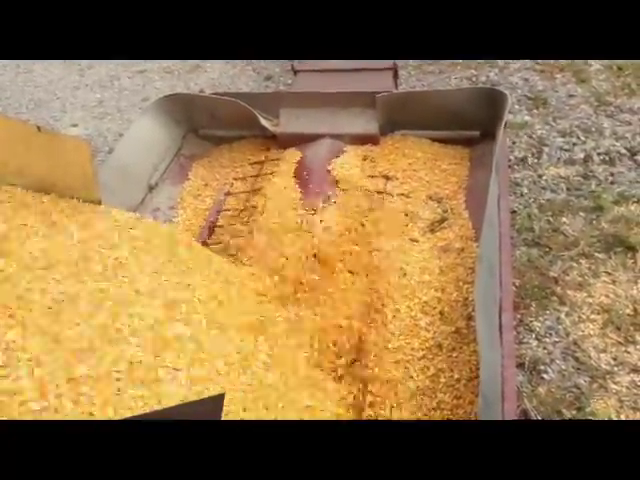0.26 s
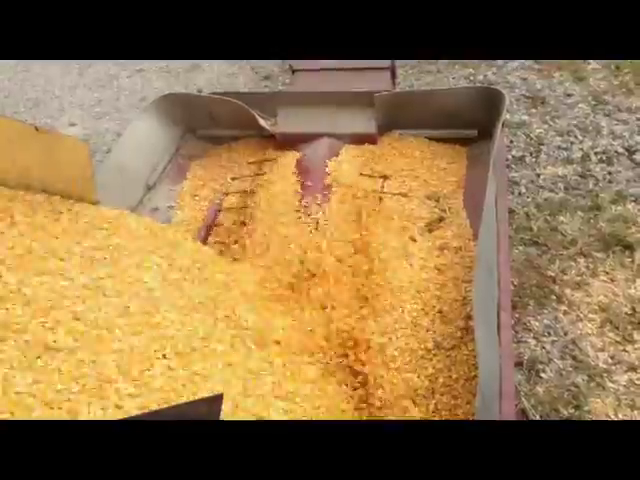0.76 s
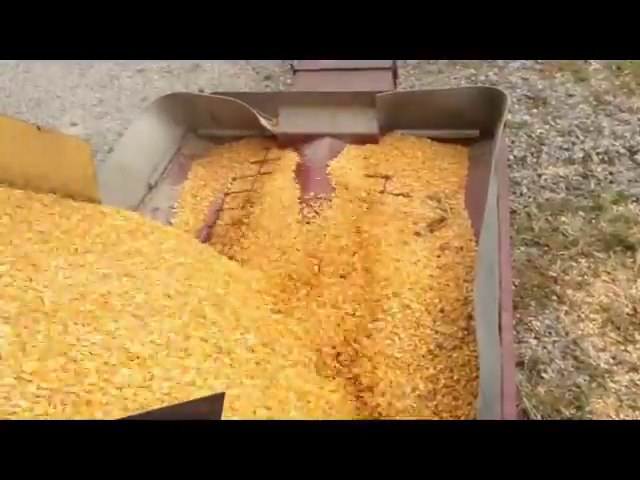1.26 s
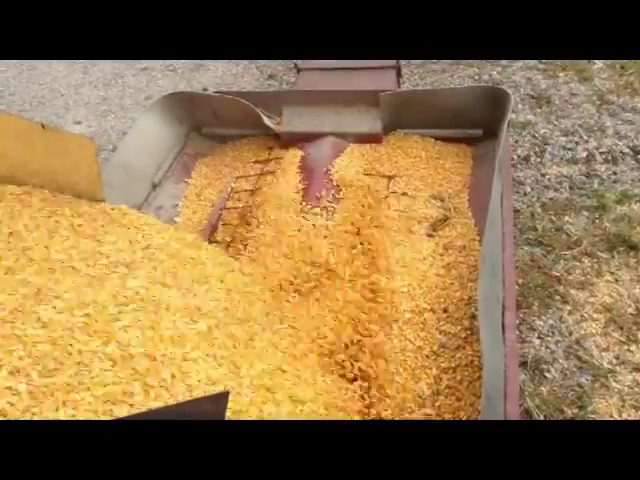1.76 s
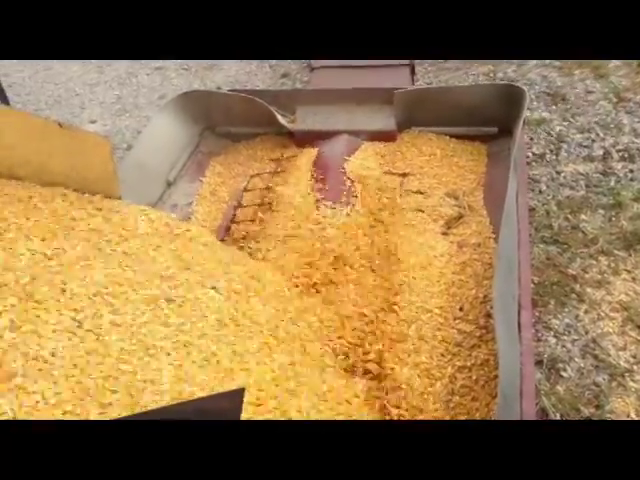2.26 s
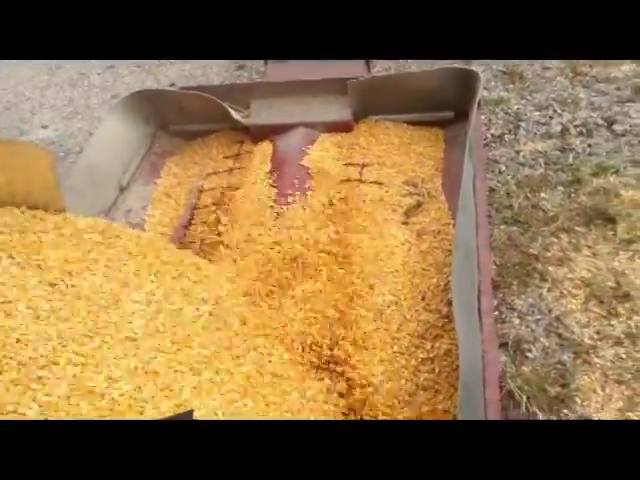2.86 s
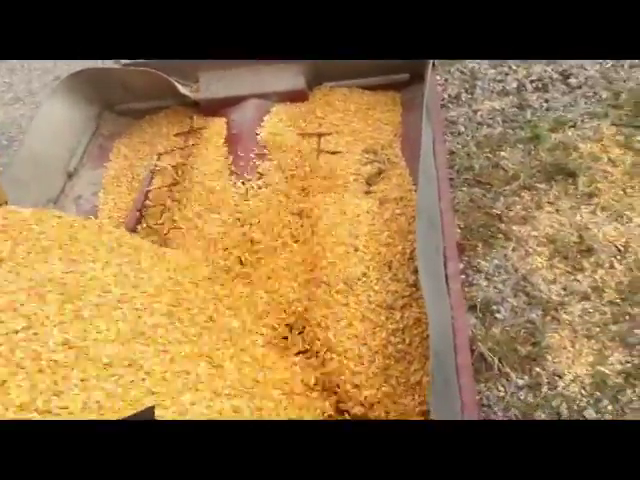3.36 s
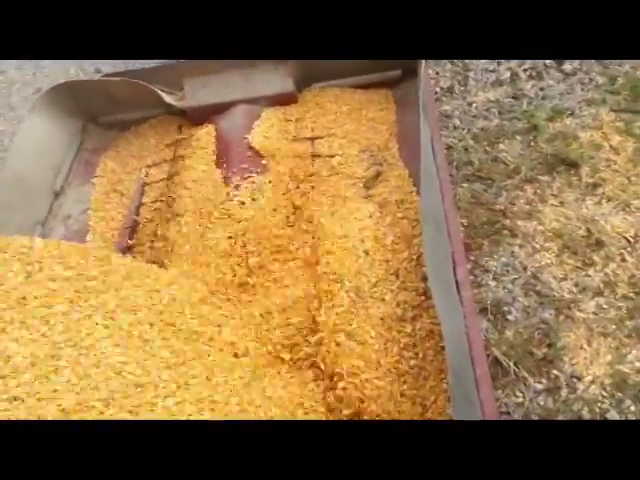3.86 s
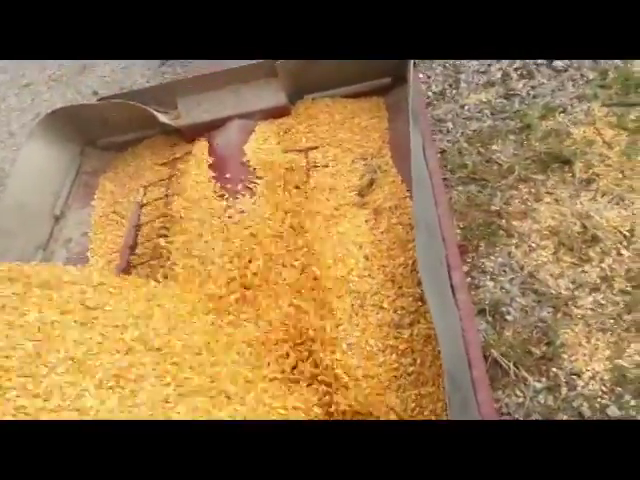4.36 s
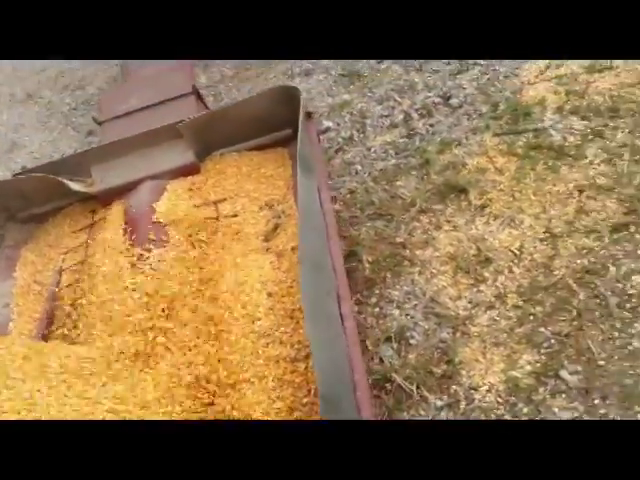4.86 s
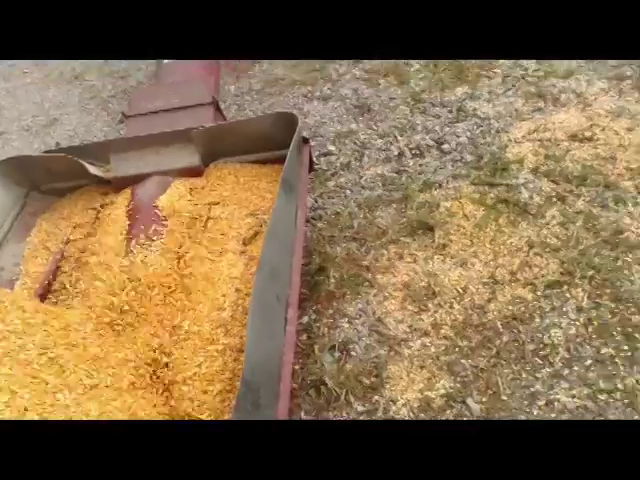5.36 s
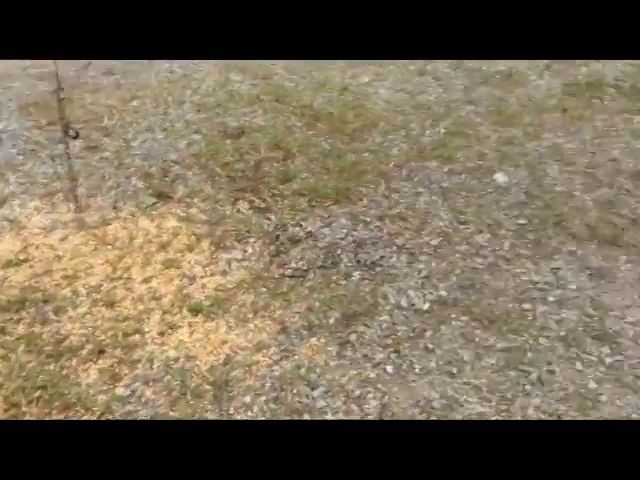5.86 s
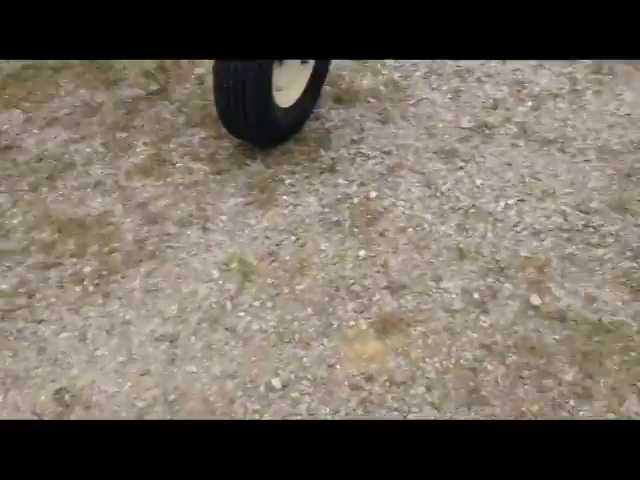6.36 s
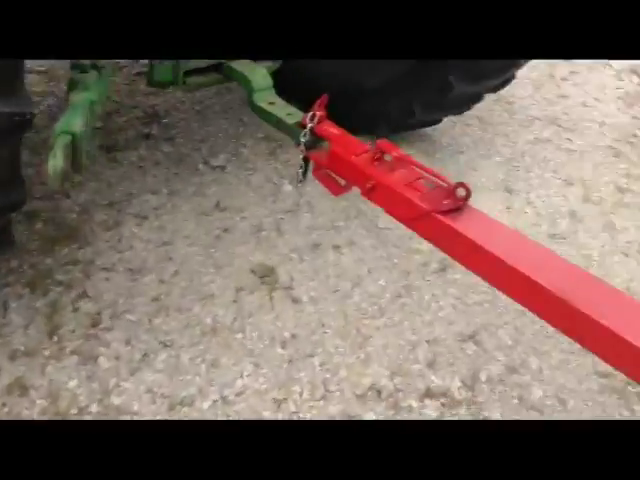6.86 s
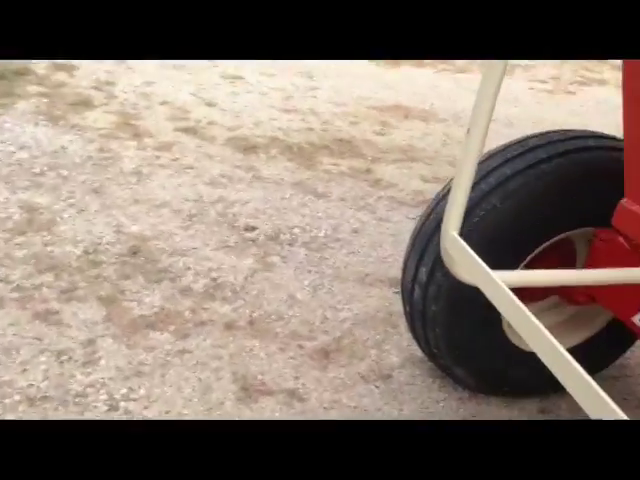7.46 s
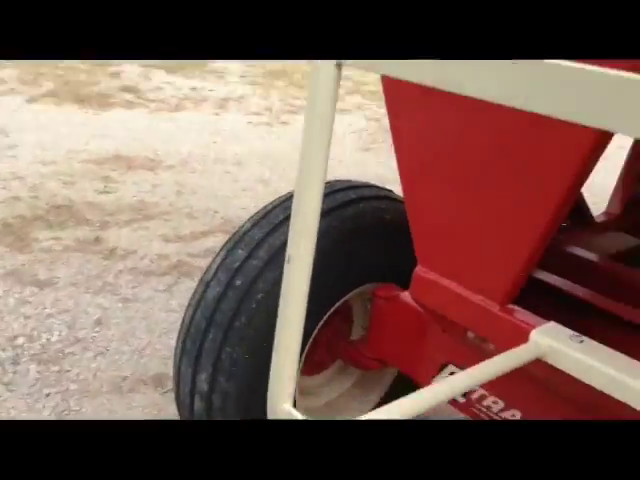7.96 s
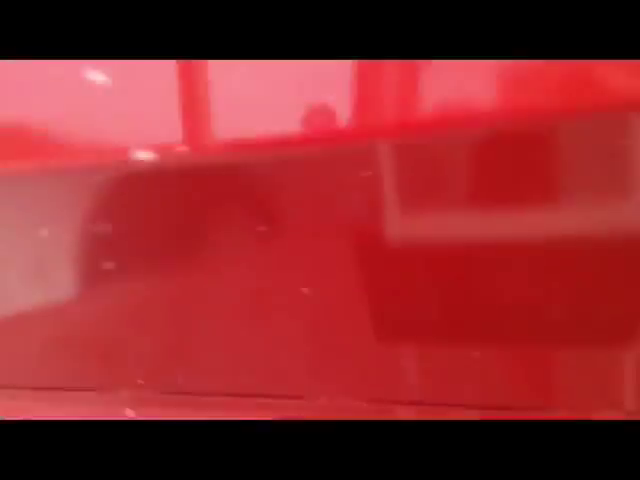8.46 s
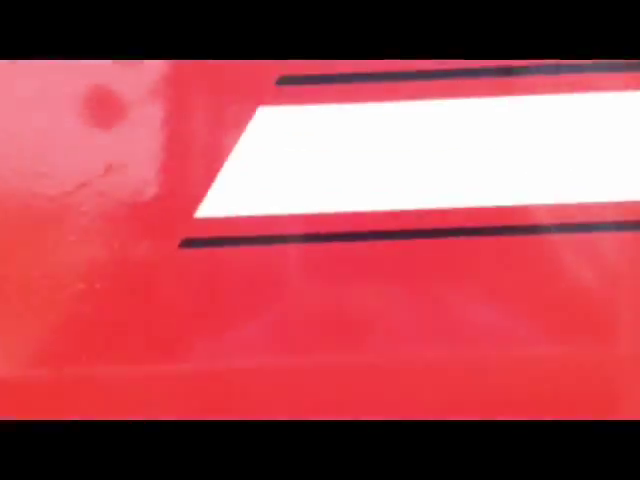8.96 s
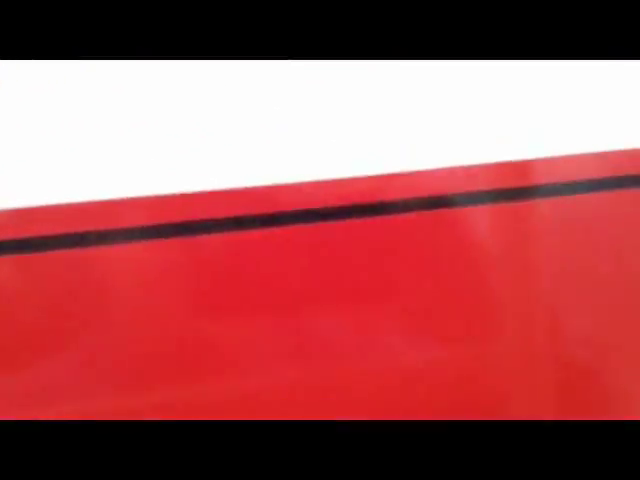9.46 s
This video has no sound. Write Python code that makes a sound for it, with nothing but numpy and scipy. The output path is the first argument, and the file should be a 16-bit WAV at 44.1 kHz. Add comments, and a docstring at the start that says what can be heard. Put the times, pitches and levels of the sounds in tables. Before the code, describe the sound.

Corn pours into a steel hopper with a loud, steady hiss over a running tractor, and one dull metal clunk comes near the end.

```python
"""Shelled corn pours from a wagon chute into a steel auger hopper: countless kernels click into one
loud, surging hiss, with a six-cylinder tractor and the humming auger drive behind it. From about
5.5 s the microphone turns towards the tractor and its clatter grows. At 8.2 s a dull clunk rings
on steel and brief rattling flares appear in the hiss. The microphone ends close to the wagon's
steel side, which mirrors the hiss and hollows out shifting bands of it."""
import sys
import numpy as np
from scipy.fft import rfft, irfft, next_fast_len
from scipy.io import wavfile
from scipy.ndimage import map_coordinates

SR = 44100
rng = np.random.default_rng(int(sys.argv[2]) if len(sys.argv) > 2 else 0)


def wav_out(sig):
    """Save sig, one row per channel (or a flat mono array), as 16-bit PCM at SR to the path in sys.argv[1]."""
    wavfile.write(sys.argv[1], SR, np.round(np.clip(np.atleast_2d(sig).T, -1, 1) * 32767).astype(np.int16))


N = 428652
TOP_HZ = 15450

# Spectrum of kernels on corn and steel. Each row: frequency in Hz, relative density in dB.
IMPACT_SPECTRUM = [(900, -34), (1350, -9), (1600, -2.5), (2300, -0.5), (3000, -1.5), (3400, 0.9), (5000, 1),
                   (6000, -0.34), (7500, -2.5), (8900, -3.5), (11500, -5), (13000, -8.5), (14900, -12),
                   (15500, -22)]
# Broad rings of the hopper's sheet steel. Each row: frequency in Hz, width in Hz, relative gain in dB.
SHEET_MODES = [(1680, 230, -33), (3280, 150, -22), (4800, 270, -26), (5360, 180, -12), (6730, 180, -20),
               (6900, 250, -20), (9600, 180, -30)]
def kernel_impacts():
    """Dense impacts merge into noise, the nearest stand out as ticks, and the steel echoes both."""
    merged = noise(lambda hz: spectrum_gain(IMPACT_SPECTRUM, hz) * resonances(hz, SHEET_MODES))
    ticks = kernel_ticks(count=14000, pitch_hz=6024, log_spread=0.403, decay_cycles=6.2, spread_db=4.5)
    impacts = merged + amp(-9.5) * ticks
    return impacts + amp(-22.5) * steel_echoes(impacts, sway=0.011, sways_per_s=0.7, longest_ms=14)


def kernel_ticks(count, pitch_hz, log_spread, decay_cycles, spread_db, samples=200):
    """Single kernels, each ringing for a few cycles at its own pitch; rms 1."""
    pitch, strength = rng.standard_normal((count, 2)).T
    hz = np.clip(pitch_hz * np.exp(log_spread * pitch), 1500, TOP_HZ)
    cycles = hz[:, None] * np.arange(samples) / SR
    gain = amp(spread_db * np.minimum(strength, 2.5))
    rings = gain[:, None] * np.sin(2 * np.pi * cycles) * np.exp(-cycles / decay_cycles)
    at = rng.integers(0, N, count)[:, None] + np.arange(samples)
    return unit(np.bincount(at.ravel(), rings.ravel(), N)[:N])


# Colour as the microphone turns. Each row: time in seconds, patter and fizz gains in dB before trim.
FACING = [(0, -10.1, -.6), (1.5, -10.5, -1.2), (4.6, -9.5, -1.8), (6.1, -7.2, -2.5), (7.03, -7, -6.5),
          (7.55, -7.5, -4), (8.05, -9.3, -2.2), (8.3, -8.2, -5.5), (8.43, -6.5, -4.5), (8.53, -9, -2.5),
          (8.75, -10, -3.5), (9.1, -9, -2.5), (9.3, -11.2, -3.5), (9.72, -9, -2.5)]
# Swells and lulls of the hiss. Each row: centre in seconds, length in seconds, change in dB.
SWELLS = [(.14, .07, -1), (0.539, .08, -1.5), (.94, .05, 1.5), (1, .05, -1), (1.62, 0.15, -0.5),
          (2.37, .08, -1.8), (3.258, .12, -1), (3.69, .06, 1), (4.221, 0.044, 1), (4.499, .1, -1.5),
          (5.21, .11, -2), (5.64, .12, -.9), (6.09, .18, 0.8), (6.51, .08, -0.5), (6.85, .25, 1),
          (7.06, 0.13, -0.7), (7.42, .07, -1.5), (7.948, 0.065, 1.2), (8.184, .12, -2), (8.55, 0.073, 1.5),
          (8.707, .06, -2.5), (8.88, .07, -0.5), (8.98, .05, 1), (9.245, .04, -2), (9.64, .06, -2.5)]
def corn_hiss(base_db=-13.3, fade_db_per_s=0.0162):
    """The impacts in three bands; the treble is most directional and drops as the microphone turns."""
    t = np.arange(N) / SR
    patter_db, fizz_db = curves(FACING)
    impacts = kernel_impacts()
    patter = unit(filtered(impacts, lambda hz: below(hz, 3036)))
    hiss = unit(filtered(impacts, lambda hz: below(hz, 7480) - below(hz, 3074)))
    fizz = unit(filtered(impacts, lambda hz: 1 - below(hz, 7010)))
    patter *= amp(patter_db - 0.98)
    hiss *= amp(-1.38 + 0.15 * wobble(16))
    fizz *= amp(fizz_db - 0.38 + 0.43 * wobble(30))
    swell_db = sum(db * bell(t, centre_s, length_s) for centre_s, length_s, db in SWELLS)
    fade_db = fade_db_per_s * t  # the microphone moves off
    return amp(base_db - fade_db + swell_db) * (patter + hiss + fizz)


# Surges and clumps of the pour. Each row: changes per second, depth in dB.
CLUMPS = [(12, 0.1), (24, 0.27), (90, 0.44)]
# Drumming of heap and hopper. Each row: frequency in Hz, relative density in dB.
DRUM_SPECTRUM = [(20, -43), (70, -34), (118, -23), (145, -6), (175, 2.5), (290, 4), (430, 0), (560, 1),
                 (680, 0.6), (850, 3.5), (1300, 0.5), (1800, 1.5), (4000, -35)]
# Low rings of the hopper's walls. Each row: frequency in Hz, width in Hz, relative gain in dB.
DRUM_MODES = [(280, 40, -10.5), (400, 18, -8), (530, 20, -11), (600, 30, -12), (840, 94, -6),
              (1170, 60, -9), (1380, 50, -8)]
def corn_pour():
    """The stream lands in clumps, so its hiss and the hopper's drumming surge together."""
    hiss = corn_hiss()
    clumps_db = sum(depth_db * wobble(per_s) for per_s, depth_db in CLUMPS)
    drumming = noise(lambda hz: spectrum_gain(DRUM_SPECTRUM, hz) * resonances(hz, DRUM_MODES))
    drumming *= amp(-29.5 + 0.82 * wobble(13))
    return amp(clumps_db) * (hiss + drumming)


# Hiss flares. Each row: centre in seconds, length in seconds, band in Hz, width in Hz, level in dB.
FLARES = [(8.1, .06, 9000, 6000, -21), (8.41, .07, 2930, 500, -22), (8.43, .24, 4030, 2200, -19.5),
          (8.66, .07, 8250, 500, -23.5), (8.68, .14, 3050, 800, -25), (8.76, .06, 6300, 450, -23),
          (8.97, .07, 3100, 700, -23.5), (8.98, .07, 7600, 600, -20), (9.16, .09, 4100, 400, -24.5),
          (9.34, .13, 7650, 350, -28), (9.37, .22, 6600, 300, -28), (9.55, .17, 7380, 400, -22.5),
          (9.71, .08, 6350, 400, -23)]
def hiss_flares(clicks_per_s=1800):
    """Brief rattling flares in the hiss, mostly narrow and high, beside the wagon."""
    out, t = np.zeros(N), np.arange(N) / SR
    clicks = rng.standard_normal(N) * (rng.random(N) < clicks_per_s / SR)
    for centre_s, length_s, band_hz, width_hz, db in FLARES:
        rattle = unit(filtered(clicks, lambda hz: bell(hz, band_hz, width_hz)))
        out += amp(db) * bell(t, centre_s, length_s) * rattle
    return out


# Contacts of the clunk. Each row: start in seconds, clack level in dB, body level in dB.
CONTACTS = [(8.197, -16, -22), (8.214, -16.5, -18), (8.229, -24, -17), (8.263, -36, -26)]
# Modes of the struck steel. Each row: frequency in Hz, relative level in dB, T60 in seconds.
CLUNK_MODES = [(181, -1, 0.11), (278, -1, 0.12), (309, -6, .11), (594, -6, .14), (740, -4, .12),
               (800, -3, .1), (960, -4.5, 0.14), (1170, -5, .06), (1490, -1, .05), (1816, 5.5, 0.054),
               (2020, 1, 0.06), (2245, 0, .06)]
def clunk(attack_s=0.00084, thud_t60_s=0.11):
    """Quick contacts on steel: hard ones ring the high modes, heavy ones the low modes and a thud."""
    out, t = np.zeros(N + SR), np.arange(SR // 2) / SR
    attack = 1 - np.exp(-t / attack_s)
    for start_s, clack_db, body_db in CONTACTS:
        ring = np.zeros(len(t))
        for mode_hz, mode_db, t60_s in CLUNK_MODES:
            blow_db = clack_db + (body_db - clack_db) * below(mode_hz, 1300, order=4)
            level_db = blow_db + mode_db + rng.normal(0, 2.2)
            ring += amp(level_db - 60 * t / t60_s) * np.sin(2 * np.pi * (mode_hz * t + rng.random()))
        rumble = noise(lambda hz: below(hz, 1000, order=3) * (1 - below(hz, 145, order=8)))
        thud = amp(body_db - 60 * t / thud_t60_s) * rumble[:len(t)]
        out[round(start_s * SR):][:len(t)] += (ring + thud) * attack
    return out[:N]


def panel_boom(start_s=8.229, pitch_hz=175, level_db=-24.5, t60_s=1.06):
    """The struck panel's lowest mode hums on after the clunk."""
    age_s = np.maximum(np.arange(N) / SR - start_s, 0)
    return amp(level_db - 60 * age_s / t60_s) * np.sin(2 * np.pi * pitch_hz * age_s)


# Tractor at the microphone. Each row: time in seconds, clatter level in dB, engine tone gain in dB.
TRACTOR_LEVELS = [(0, -33, -51), (3.6, -35.5, -49), (5.2, -35, -45), (5.75, -24.5, -42), (6.45, -29, -48),
                  (6.9, -23.5, -45), (8.2, -22.5, -38.5), (8.7, -32.5, -54), (9.72, -32, -50)]
# Engine clatter and fan rush. Each row: frequency in Hz, relative density in dB.
CLATTER_SPECTRUM = [(40, -36), (100, -24), (170, -8), (215, -1.5), (350, 0), (600, 1), (760, 1.5),
                    (950, 2.5), (1400, 1), (2000, -3), (3200, -1), (8000, -43)]
# Rings of the tractor's panels. Each row: frequency in Hz, width in Hz, relative gain in dB.
TRACTOR_MODES = [(234, 18, -3), (335, 50, -9), (943, 25, -7), (1085, 20, -6)]
# Engine tones. Each row: multiple of the cycle rate, relative level in dB.
ENGINE_ORDERS = [(9, -18), (10, -18), (16, -8), (19, -18), (24, 2), (28, -8), (31, -3.5), (41, -12),
                 (43, -18)]
# Low drone that carries round the yard. Each row: multiple of the cycle rate, level in dB.
DRONE_ORDERS = [(6, -53), (9, -54.5), (10.4, -49)]
def tractor(cycle_hz=14.56, cylinders=6, firing_db=2):
    """Engine tones, and panel-ringing clatter that swells as each cylinder fires, once in two turns."""
    clatter_db, tones_db = curves(TRACTOR_LEVELS)
    angle = rotation(cycle_hz, drift=0.001997)
    bursts = rng.standard_normal(N) * amp(firing_db * np.cos(cylinders * angle))
    clatter = filtered(
        bursts, lambda hz: spectrum_gain(CLATTER_SPECTRUM, hz) * resonances(hz, TRACTOR_MODES))
    engine = tones(angle, ENGINE_ORDERS, waver_db=3)
    drone = tones(angle, DRONE_ORDERS, waver_db=1)
    return amp(clatter_db) * unit(clatter) + amp(tones_db) * engine + drone


# Swelling bands. Each row: centre in seconds, length in seconds, band in Hz, width in Hz, level in dB.
SWELLING_BANDS = [(.5, 1.8, 1600, 220, -36), (.5, 1.8, 3330, 200, -34), (5.3, 2.4, 351.7, 50, -45),
                  (5.75, 0.69, 335, 80, -37.5), (5.5, 1.9, 485, 50, -41), (6.85, 0.55, 508, 90, -38),
                  (7.3, 1.7, 236, 36, -35.7), (7.3, 1.4, 355, 50, -42), (7.5, 0.79, 1080, 30, -34)]
def swelling_bands():
    """Narrow bands of hiss and tractor hum that swell and fade as the microphone moves."""
    out, t = np.zeros(N), np.arange(N) / SR
    for centre_s, length_s, band_hz, width_hz, db in SWELLING_BANDS:
        band = noise(lambda hz: bell(hz, band_hz, width_hz))
        out += amp(db) * bell(t, centre_s, length_s) * band
    return out


# Auger drive at the microphone. Each row: time in seconds, gain in dB.
AUGER_LEVELS = [(0, -45), (5.2, -44.5), (5.8, -38.5), (6.6, -45.5), (9.72, -41)]
# Drive tones. Each row: multiple of the shaft rate, relative level in dB.
AUGER_ORDERS = [(2, -22), (3, -8.5), (8, -7), (9, -15), (10, -3.3), (11, -2.5), (12, -8), (13, -7)]
def auger(shaft_hz=48.3):
    """The drive hums at multiples of its shaft rate."""
    gain_db, = curves(AUGER_LEVELS)
    return amp(gain_db) * tones(rotation(shaft_hz, drift=0.00098), AUGER_ORDERS, waver_db=2)


# Wagon echoes. Each row: time in seconds, wall delay in ms, wall gain, ledge delay in ms, ledge gain.
WAGON_ECHOES = [(8.15, 1.8, 0.13, .45, 0.01), (8.41, 1.4, 0, .33, 0.04), (8.58, 1.08, 0.06, 0.25, 0.04),
                (8.8, 1.24, 0.3, 0.089, 0), (9.1, 1.12, 0.2, .13, 0.1), (9.26, 0.76, 0.4, 0.14, 0.2),
                (9.72, 0.82, 0.37, 0.12, 0.1)]
def wagon_side(x, beside_from_s=8.55, ladder_ms=1.01, ladder_ms_per_s=0.07):
    """The wall mirrors the lows; ledge, ladder and frame the highs. Changing paths slide the combs."""
    wall_ms, wall_gain, ledge_ms, ledge_gain = curves(WAGON_ECHOES)
    wall = delayed(filtered(x, lambda hz: below(hz, 1600, order=2)), wall_ms)
    upper_mids = filtered(x, lambda hz: below(hz, 8700, order=6) - below(hz, 2200, order=6))
    ledge = delayed(upper_mids, ledge_ms)
    beside_s = np.maximum(np.arange(N) / SR - beside_from_s, 0)
    treble = filtered(x, lambda hz: below(hz, 10500) - below(hz, 4500))
    ladder = 0.18 * delayed(treble, ladder_ms + ladder_ms_per_s * beside_s)
    frame = amp(-16) * steel_echoes(treble, sway=0.09, sways_per_s=3.5, longest_ms=3.5, count=3)
    fade_in = np.tanh(beside_s / 0.12)
    return x + wall_gain * wall + ledge_gain * ledge + fade_in * (ladder + frame)


# Wagon notches. Each row: centre in seconds, length in seconds, band in Hz, width in Hz, dip in dB.
NOTCHES = [(8.68, .12, 7750, 450, -5), (8.85, .3, 700, 900, -1.5), (8.97, .3, 5700, 1200, -2),
           (8.97, .25, 1900, 350, -3), (9.27, .2, 3500, 900, -4), (9.32, .18, 1550, 400, -2),
           (9.32, .2, 680, 350, -3), (9.62, .16, 3500, 700, -3)]
def cancellations(x):
    """Where direct and mirrored sound cancel, a band sinks and comes back."""
    out, t = x.copy(), np.arange(N) / SR
    for centre_s, length_s, band_hz, width_hz, dip_db in NOTCHES:
        band = filtered(x, lambda hz: bell(hz, band_hz, width_hz))
        out += (amp(dip_db) - 1) * bell(t, centre_s, length_s) * band
    return out


def steel_echoes(x, sway, sways_per_s, longest_ms, count=8):
    """Short echoes off nearby steel; microphone sway varies each path by a share of its length."""
    paths_ms = rng.uniform(1.53, longest_ms, count)
    return sum(delayed(x, ms * (1 + sway * wobble(sways_per_s))) for ms in paths_ms)


def rotation(hz, drift):
    """Angle in radians of a shaft whose speed wanders slightly."""
    return 2 * np.pi * np.cumsum(hz * (1 + drift * wobble(1.99))) / SR


def tones(angle, orders, waver_db):
    """Multiples of a rotation, each wavering in level on its own."""
    return sum(amp(db + waver_db * wobble(1.96)) * np.sin(order * angle + rng.uniform(0, 2 * np.pi))
               for order, db in orders)


def resonances(hz, modes):
    """Response of a surface that adds its modes to the direct sound."""
    return 1 + sum(amp(db) * 1j * hz * width_hz / (mode_hz ** 2 - hz ** 2 + 1j * hz * width_hz)
                   for mode_hz, width_hz, db in modes)


def spectrum_gain(points, hz):
    """Gain through (Hz, dB) points on a log frequency axis."""
    points_hz, db = np.transpose(points)
    return amp(np.interp(np.log(hz + 1), np.log(points_hz + 1), db))


def curves(rows):
    """One value per sample for each column after the time."""
    times_s, *columns = np.transpose(rows)
    return [np.interp(np.arange(N) / SR, times_s, column) for column in columns]


def wobble(knots_per_s, step=32):
    """Smooth random curve, rms near 1."""
    at = np.arange(0, N + step, step)
    knots = rng.standard_normal(int(N * knots_per_s / SR) + 4)
    return np.interp(np.arange(N), at, map_coordinates(knots, [at * knots_per_s / SR]))


def noise(response):
    """Coloured noise, rms 1."""
    return unit(filtered(rng.standard_normal(N), response))


def filtered(x, response):
    """x through a frequency response, a function of Hz."""
    size = next_fast_len(N + SR // 2)
    return irfft(rfft(x, size) * response(np.fft.rfftfreq(size, 1 / SR)), size)[:N]


def delayed(x, delay_ms):
    """x over a path of changing length."""
    return np.interp(np.arange(N) - delay_ms * SR / 1000, np.arange(N), x)


def below(hz, edge_hz, order=12):
    """Soft low-pass gain, 0.5 at the edge."""
    return 1 / (1 + (hz / edge_hz) ** order)


def bell(x, centre, width):
    """Gaussian of height 1, full width at 1/e."""
    return np.exp(-(2 * (x - centre) / width) ** 2)


def amp(db):
    """Decibels to gain."""
    return 10 ** (np.asarray(db) / 20)


def unit(x):
    """x at rms 1."""
    return x / np.sqrt(np.mean(x ** 2) + 1e-20)


def scene():
    """Corn and machines mirrored by the wagon, plus hiss flares and the clunk; mono."""
    direct = corn_pour() + tractor() + swelling_bands() + auger()
    mirrored = cancellations(wagon_side(direct))
    return (mirrored + hiss_flares() + clunk() + panel_boom())[None]


def record(dry):
    """The recorder cuts the deep bass, rounds the highest peaks and passes nothing above TOP_HZ."""
    x = filtered(dry[0], lambda hz: np.maximum(1 - below(hz, 93.6, order=8), amp(-33)))
    x = x / (1 + np.abs(x / 0.95) ** 8) ** (1 / 8)
    return filtered(x, lambda hz: hz < TOP_HZ)[None]


dry = scene()
out = record(dry)
wav_out(out)
```